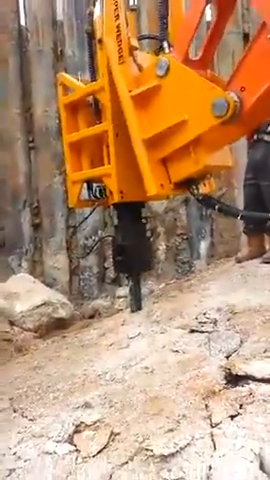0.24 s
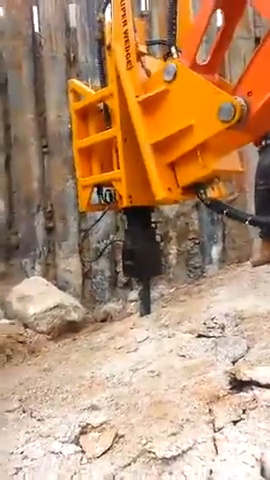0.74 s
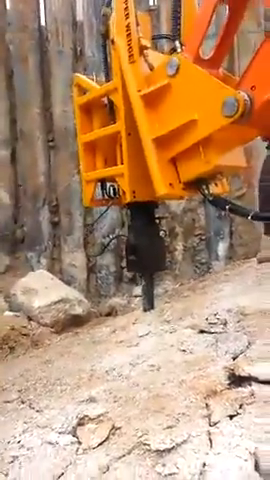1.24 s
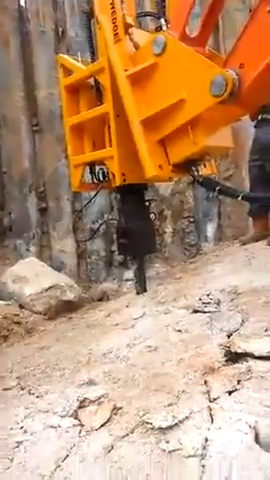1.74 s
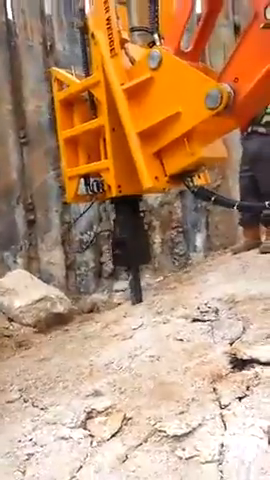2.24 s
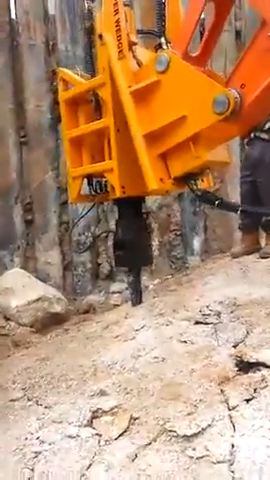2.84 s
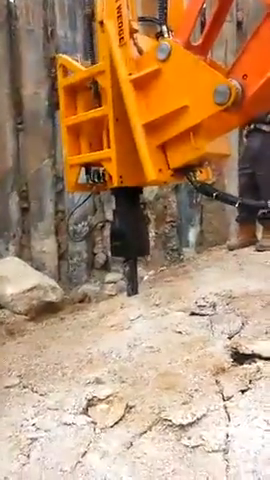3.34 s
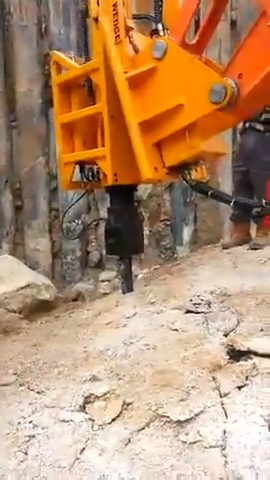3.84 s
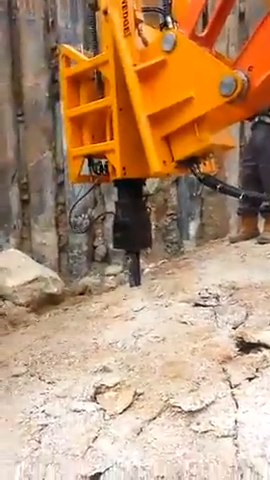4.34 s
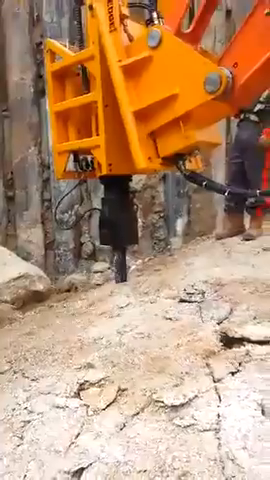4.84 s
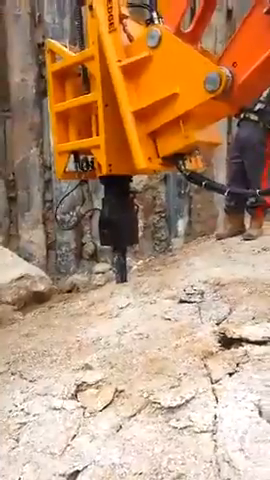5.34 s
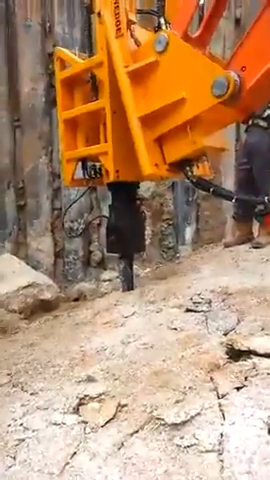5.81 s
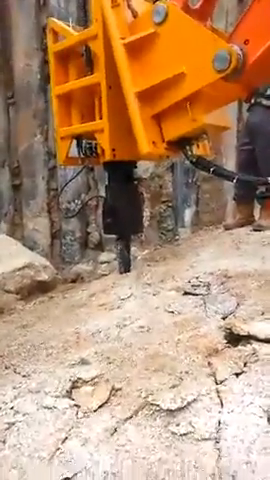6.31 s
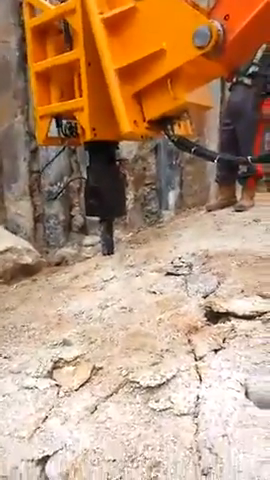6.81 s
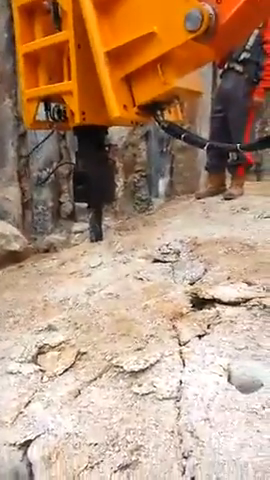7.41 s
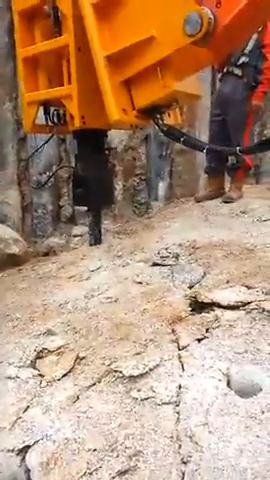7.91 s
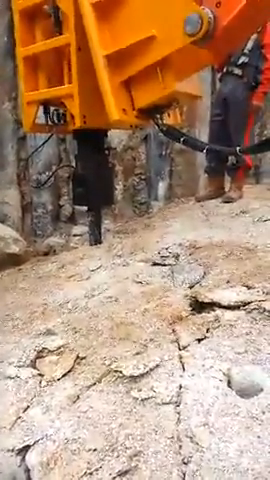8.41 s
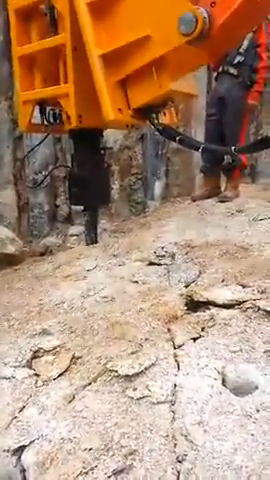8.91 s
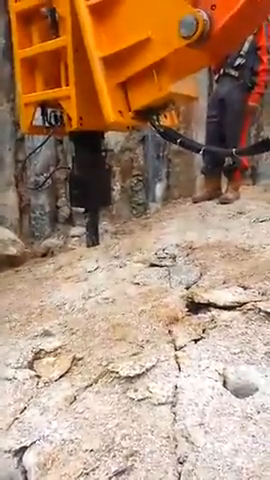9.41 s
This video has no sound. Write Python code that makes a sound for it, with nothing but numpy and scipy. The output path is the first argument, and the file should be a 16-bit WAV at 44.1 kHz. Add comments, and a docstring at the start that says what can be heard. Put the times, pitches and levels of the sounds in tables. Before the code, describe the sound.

At an outdoor work site, a hydraulic wedge is forced into rock over the constant drone and whine of an excavator. Early on the engine strains and a valve squeals in shifting high pitches, then oil surges. After a few small ticks, the rock bursts with one loud crack and a short tearing crunch. A smaller snap follows while the engine noise dips in level and comes back.

```python
"""An excavator's hydraulic wedge splits rock: the stone ticks, then bursts, and the steel rings.
A droning engine turns a whining nine-piston pump, over diesel roar and turbo whistle.
Under load the shaft sags and a relief valve squeals; oil surges as a valve switches.
The camera takes a few soft bumps, and its gain control ducks everything after the burst."""
import sys
import numpy as np
from scipy.fft import rfft, irfft, next_fast_len
from scipy.io import wavfile
from scipy.ndimage import uniform_filter1d, minimum_filter1d, map_coordinates

SR = 44100
rng = np.random.default_rng(int(sys.argv[2]) if len(sys.argv) > 2 else 0)


def generate_wav(sig):
    """Save sig (samples, or channels by samples) to the path in sys.argv[1] as 16-bit PCM at SR."""
    pcm = np.round(np.clip(np.atleast_2d(sig).T, -1, 1) * 32767).astype(np.int16)
    wavfile.write(sys.argv[1], SR, pcm)


N = 426006
T = np.arange(N) / SR
PUSH_S, STALL_S, RELEASE_S, SPLIT_S = 1.02, 1.8, 2.627, 5.77
BUILD_S, DRAIN_S = 0.595, 0.294  # oil pressure rise and fall


def amp(db):
    """Decibels to gain."""
    return 10 ** (np.asarray(db) / 20)


def unit(x):
    """Scale to rms 1."""
    return x / np.sqrt(np.mean(x ** 2) + 1e-20)


def along(points, hz):
    """Interpolate (hz, value) points on a log axis."""
    knots_hz, values = np.transpose(points)
    return np.interp(np.log(hz + 1), np.log(knots_hz + 1), values)


def curve(points):
    """Interpolate (time_s, value) points per sample."""
    return np.interp(T, *np.transpose(points))


def ramp(start_s, length_s):
    """Smooth step, 0 to 1."""
    return np.sin(np.pi / 2 * np.clip((T - start_s) / length_s, 0, 1)) ** 2


def swell(start_s, length_s):
    """Smooth rise and fall."""
    return np.sin(np.pi * np.clip((T - start_s) / length_s, 0, 1)) ** 2


def wobble(rate_hz):
    """Smooth random curve, rms 1."""
    knots = rng.standard_normal(int(N * rate_hz / SR) + 4)
    return unit(map_coordinates(knots, [T * rate_hz]))


def band(centre_hz, width_oct):
    """Bell-shaped response on a log axis."""
    return lambda hz: np.exp(-0.5 * (np.log2((hz + 1) / centre_hz) / width_oct) ** 2)


def resonances(modes):
    """Response of (centre_hz, width_hz, level_db) modes."""
    return lambda hz: np.sqrt(sum(amp(db) ** 2 / (1 + (2 * (hz - centre_hz) / width_hz) ** 2) ** 2
                                  for centre_hz, width_hz, db in modes))


def filtered(x, response):
    """Apply a frequency response."""
    n = x.shape[-1]
    padded = next_fast_len(n + 8192)
    return irfft(rfft(x, padded) * response(np.fft.rfftfreq(padded, 1 / SR)), padded)[..., :n]


def warp(x, speed):
    """Run a stereo sound at a changing speed."""
    return np.array([np.interp(np.cumsum(speed), np.arange(len(channel)), channel) for channel in x])


def rush(colour, envelope=np.ones(N)):
    """Stereo noise, rms 1, enveloped then coloured; coherent bass, diffuse treble."""
    # left-right likeness: freq_hz, coherence
    likeness = [(30, .6), (100, 0.95), (330, 0.97), (600, 0.69), (1200, 0.42), (2500, 0.36), (5000, 0.11),
                (8000, 0.22)]

    def mid_side(hz):
        angle = np.arccos(np.clip(along(likeness, hz), -1, 1)) / 2
        return colour(hz) * np.array([np.cos(angle), np.sin(angle)])

    mid, side = filtered(envelope * rng.standard_normal((2, len(envelope))), mid_side)
    return unit(np.array([mid + side, mid - side]))


def tone(phase, flutter, rate_hz):
    """Sine, rms 1, whose level and phase flutter in moving air."""
    in_phase = (1 + flutter * wobble(rate_hz)) * np.sin(phase)
    return unit(in_phase + flutter * wobble(rate_hz) * np.cos(phase))


def pressure():
    """Oil pressure on the wedge, 0-1: builds, holds, drains."""
    return ramp(PUSH_S, BUILD_S) * (1 - ramp(RELEASE_S, DRAIN_S))


def idle():
    """1 until the pump engages at the push, then 0."""
    return 1 - ramp(PUSH_S, 0.12)


def overtone_shift_db(stalled_db, freed_db):
    """Level change while the wedge is stalled and after the rock splits."""
    stalled = ramp(STALL_S, 0.15) * (1 - ramp(RELEASE_S, DRAIN_S))
    return stalled_db * stalled + freed_db * ramp(SPLIT_S, 0.3)


def bumps(length_s=0.08):
    """Dull knocks on the camera body, different at each microphone."""
    # knocks: centre_s, level_db
    knocks = [(2.41, -47), (8.27, -43), (8.6, -46), (8.915, -43)]
    envelope = sum(amp(db) * swell(centre_s - length_s / 2, length_s) for centre_s, db in knocks)
    return envelope * unit(filtered(rng.standard_normal((2, N)), band(centre_hz=32, width_oct=0.7)))


def turbo():
    """Turbocharger whistle, wandering slightly in pitch."""
    # whistle: time_s, level_db
    levels = [(0, -38.5), (1.1, -46), (3, -44), (4.2, -40.5), (5.7, -42), (7.4, -38), (8.4, -36.5),
              (9.66, -35.5)]
    level_db = curve(levels) + 0.86 * wobble(3.6)
    pitch_hz = 2720 + 5 * wobble(3)
    return amp(level_db) * tone(2 * np.pi * np.cumsum(pitch_hz) / SR, flutter=0.24, rate_hz=25)


def oil_hiss():
    """Flowing oil, louder under pressure."""
    # hiss spectrum: freq_hz, density_db
    spectrum = [(1500, -25), (3000, -1), (3800, -1.5), (4800, 1.5), (5600, 0.9), (6400, -0.2), (7200, -4),
                (8000, -13)]
    level_db = -29 + 2.5 * pressure() + 0.68 * wobble(19)
    return amp(level_db) * rush(lambda hz: amp(along(spectrum, hz)))


def engine_block(shaft_phase):
    """The engine hums at multiples of the shaft speed."""
    # engine orders: multiple, level_db
    orders = [(3, -56), (7, -38.5), (10, -41.5), (11, -40.5), (14, -39), (24, -46), (30, -54.5)]
    return sum(amp(db) * tone(k * shaft_phase, flutter=0.56, rate_hz=12) for k, db in orders)


def diesel_roar():
    """Broad engine noise, slightly softer under load."""
    # roar spectrum: freq_hz, density_db
    spectrum = [(25, -38.5), (55, -24.5), (90, -10.5), (160, -2), (200, -3), (330, 2), (480, 0.5),
                (740, -1.5), (1020, 0.5), (1130, -1.5), (1320, 1.5), (1480, -1.5), (1980, -2), (2820, -7),
                (3020, -9.5), (3500, -12.5), (8000, -39.5)]
    level_db = -20 - pressure() + 0.47 * wobble(25)
    return amp(level_db) * rush(lambda hz: amp(along(spectrum, hz)))


def engine_drone(drone_phase, sag_hz):
    """Engine drone that swells as the shaft sags through one speed."""
    # drone partials: drone_multiple, level_db, swell_share, stalled_db, freed_db
    partials = [(2 / 3, -48, 0, 0, 0), (1, -35, 0, -3.5, 0.5), (2, -32, 0.87, 0.5, -2),
                (8 / 3, -39, 0.5, -4.5, -3.5), (4, -39, 0.4, 5, 2), (6, -42, 1.06, -1, -1),
                (8, -42.5, 0, -1, 7)]
    peak_sag_hz, width_hz = 4.1, 1.9
    nearness = np.exp(-0.5 * ((sag_hz - peak_sag_hz) / width_hz) ** 2)
    swell_db = 7.5 * nearness - 5.5 * idle() + wobble(7.8)
    return sum(amp(db + share * swell_db + overtone_shift_db(stalled_db, freed_db))
               * tone(k * drone_phase, flutter=0.18, rate_hz=13)
               for k, db, share, stalled_db, freed_db in partials)


def pump(piston_phase, unload_s=0.11):
    """Piston harmonics blend hum and whine; the hum dips whenever the pump eases off."""
    # piston harmonics: multiple, level_db, whine_share (the rest is hum), stalled_db, freed_db
    harmonics = [(1, 1.1, 0.08, -1, 0.5), (2, -10, 0.22, -5.5, 3), (3, -2, 0.99, -3, 0.5),
                 (4, -7.5, 0.8, 3, 0.5)]
    # pump easing off: start_s, drop_db, recovery_s
    unloads = [(0.64, 7.5, 0.12), (0.9, 8, 0.06), (2.77, 14.0, 0.22), (5.77, 4.5, 0.55), (8.05, 2.5, 3.6)]
    dip_db = sum(db * ramp(start_s, unload_s) * np.exp(-np.maximum(T - start_s - unload_s, 0) / recovery_s)
                 for start_s, db, recovery_s in unloads)
    hum_db = -20.5 - 4.5 * idle() - 0.5 * pressure() - dip_db + 0.48 * wobble(4)
    whine_db = -33.5 + 2 * idle() + pressure() + 1.2 * wobble(7)
    return sum(amp(db + share * whine_db + (1 - share) * hum_db + overtone_shift_db(stalled_db, freed_db))
               * tone(k * piston_phase, flutter=0.05 * k ** 2, rate_hz=26)
               for k, db, share, stalled_db, freed_db in harmonics)


def pump_rings(piston_phase):
    """The idling pump's third harmonic flares into short metallic rings."""
    # flares: start_s, length_s, level_db
    flares = [(.18, 0.083, -32), (0.276, .08, -30.5), (0.492, .04, -27.5), (0.547, 0.037, -21),
              (0.601, .08, -28)]
    envelope = sum(amp(db) * swell(start_s, length_s) for start_s, length_s, db in flares)
    return envelope * np.sqrt(2) * np.sin(3 * piston_phase)


def machine(free_piston_hz=321.25):
    """The shared shaft stumbles at the push, is caught by the governor and runs free after the split."""
    # drop in piston rate: time_s, sag_hz
    sag = [(0, 0.095), (1.03, 0.3), (1.29, 4.95), (1.67, 7), (1.96, 3.103), (2.75, 3.15), (3.0, 0.1),
           (3.33, 1.395), (5.8, 1.39), (5.95, 0.4), (9.66, 0.4)]
    sag_hz = curve(sag)
    piston_hz = free_piston_hz - sag_hz + 0.25 * wobble(4)
    piston_phase = 2 * np.pi * np.cumsum(piston_hz) / SR
    shaft_phase, drone_phase = piston_phase / 9, piston_phase * 0.434
    pumping = pump(piston_phase) + pump_rings(piston_phase)
    engine = engine_block(shaft_phase) + engine_drone(drone_phase, sag_hz) + turbo()
    drone_throb = 1 + 0.028 * np.cos(drone_phase) + 0.022 * np.cos(2 * drone_phase)
    return pumping + engine + drone_throb * (diesel_roar() + oil_hiss())


def valve_rush(open_db=-27.5, seep_db=-34):
    """Oil seeps past the relief valve's seat, then rushes through as it lifts."""
    # valve resonances: centre_hz, width_hz, level_db
    modes = [(2270, 30, 0), (2320, 30, 1), (2210, 520, -6), (2470, 40, -1.5), (4900, 460, -11),
             (5730, 400, -19), (6400, 300, -14), (7180, 280, -12.5), (7730, 280, -16.5)]
    opening = ramp(start_s=1.37, length_s=0.13) * (1 - ramp(RELEASE_S, 0.21))
    flow = amp(open_db) * opening + amp(seep_db) * pressure()
    return flow * amp(1.2 * wobble(22)) * warp(rush(resonances(modes)), speed=1 + 0.008 * wobble(14))


def valve_squeal(flutter=0.25, rate_hz=70):
    """The trembling valve seat squeals, hopping between pitches."""
    # squeals: start_s, length_s, pitch_hz, level_db
    squeals = [(1.505, .115, 2468, -26), (1.6, .11, 2272, -30), (1.66, .28, 2466, -28.3),
               (1.72, .13, 2330, -32.5), (1.92, .08, 2275, -31.5), (1.985, 0.065, 2272, -26),
               (2.106, 0.064, 2465, -29.5), (2.203, .075, 2330, -24.5), (2.28, .11, 2335, -32),
               (2.29, .19, 2273, -32.5), (2.438, .15, 2330, -31), (2.49, .15, 2487, -30)]
    tremble = 1 + flutter * (wobble(rate_hz) + 1j * wobble(rate_hz))
    notes = sum(amp(db) * swell(start_s, length_s) ** 0.35 * np.exp(2j * np.pi * hz * T)
                for start_s, length_s, hz, db in squeals)
    return np.sqrt(2) * np.real(notes * unit(np.abs(tremble)) * np.exp(1j * np.angle(tremble)))


def oil_surges():
    """A valve switches and the oil gulps: mono turbulence falling in pitch as it slows."""
    # gulps: start_s, length_s, start_hz, end_hz, width_oct, level_db
    gulps = [(1.017, .11, 900, 380, .8, -21.5), (2.655, .085, 850, 550, .6, -19),
             (2.69, .085, 500, 380, .3, -14), (2.72, .075, 310, 250, .35, -17),
             (2.69, .165, 170, 145, .28, -22.5)]
    out = np.zeros(N)
    for start_s, length_s, start_hz, end_hz, width_oct, db in gulps:
        eddies = rush(band(start_hz, width_oct), np.ones(SR // 2))
        progress = np.clip((T - start_s) / length_s, 0, 1)
        speed = (end_hz / start_hz) ** progress * (T > start_s)
        out += amp(db) * swell(start_s, length_s) ** 0.55 * warp(eddies, speed)[0]
    return out


def rock_ticks():
    """Small fractures around the wedge, each a short dying crackle."""
    # fractures: start_s, level_db, centre_hz, width_oct, t60_s
    fractures = [(1.026, -18, 4650, 0.14, 0.085), (1.023, -20, 3000, .55, .14),
                  (2.413, -19.5, 5040, 0.37, 0.091), (2.848, -19.5, 6030, 0.3, .05),
                 (2.88, -15.5, 4480, 0.49, 0.1), (4.13, -13, 1405, 0.99, .015),
                 (4.15, -21, 2880, 0.18, 0.055), (4.499, -17, 4820, 0.51, 0.017),
                 (5.694, -3.5, 1045, 1.3, 0.014), (5.7515, -10, 4030, .9, .04), (5.7546, 6, 650, 0.7, .02),
                 (6.258, 6, 640, 0.68, 0.013), (6.2578, -5, 1895, 0.9, 0.013),
                 (6.2604, -4.5, 1694, 0.9, .014), (6.266, -5, 620, .7, 0.025),
                 (8.074, -23, 5440, 0.37, 0.14), (8.593, -22.5, 3040, 0.5, 0.1),
                 (8.925, -25.5, 4290, .6, .06), (9.4172, -16, 6750, 0.15, .017),
                 (9.4878, -16.5, 6600, 0.17, 0.012), (9.5597, -15, 6300, .14, 0.02)]
    lead = SR // 200  # room for the filter's pre-ring
    out, t = np.zeros((2, N + SR)), T[:SR // 4]
    for start_s, db, centre_hz, width_oct, t60_s in fractures:
        fade = np.pad(amp(-60 * t / t60_s), (lead, 0))
        crackle = rush(band(centre_hz, width_oct), fade) * np.sqrt(np.mean(fade ** 2))
        first = round(start_s * SR) - lead
        out[:, first:first + len(fade)] += amp(db) * crackle
    return out[:, :N]


def wedge_slips():
    """The wedge jerks forward with thuds and groans."""
    # slips: start_s, length_s, pitch_hz, level_db
    slips = [(5.751, 0.013, 245, 3), (5.754, 0.012, 852, 3.5), (5.784, 0.048, 407.5, 3),
             (5.816, 0.015, 407.5, 0), (5.838, 0.035, 280, -8)]
    return sum(amp(db) * swell(start_s, length_s) * np.sqrt(2) * np.sin(2 * np.pi * hz * T)
               for start_s, length_s, hz, db in slips)


def rock_split():
    """The rock bursts, then tears, in gritty fractures that ring the steel wedge."""
    # burst and tear: start_s, rise_s, hold_s, level_db, t60_s, grit_db, ring_db
    bursts = [(5.758, 0.001, 0.0076, 11, 0.035, 3, 0), (5.763, 0.032, 0.012, 1.8, 0.27, 3.3, -10)]
    # fracture spectrum: freq_hz, density_db
    stone = [(60, -24), (170, -6), (400, 4.5), (650, 0.5), (850, 1.5), (980, -5), (1300, -3.5), (2000, -2),
             (3500, -7), (5200, -6), (6800, -9), (8000, -19.5)]
    # wedge and rock resonances: centre_hz, width_hz, level_db
    modes = [(404, 100, 0.5), (820, 150, -1), (2920, 400, -5.5), (4770, 170, -0.5), (5170, 160, -3),
             (6600, 260, -5.5)]
    out = np.zeros((2, N))
    for start_s, rise_s, hold_s, db, t60_s, grit_db, ring_db in bursts:
        grains = amp(grit_db * wobble(1200))
        fractures = rush(lambda hz: amp(along(stone, hz)), grains)
        ringing = amp(ring_db) * rush(resonances(modes), grains)
        decay_db = 60 * np.maximum(T - start_s - rise_s - hold_s, 0) / t60_s
        out += ramp(start_s, rise_s) * amp(db - decay_db) * (fractures + ringing)
    return out


def off_axis(x):
    """Sound from the side reaches the left microphone slightly later, with more midrange."""
    # left minus right: freq_hz, level_db
    lean = [(100, 0), (330, -0.6), (900, 2.5), (1500, 3.5), (2500, 5.5), (4400, -0.5), (7500, 3)]
    # left behind right: freq_hz, lag_rad
    lag = [(100, 0), (330, -0.15), (1100, 0), (2760, 1.3), (4000, 5.8), (5500, 7), (7700, 10.5)]
    side = np.array([[0.5], [-0.5]])
    return filtered(x, lambda hz: amp(side * along(lean, hz)) * np.exp(-1j * side * along(lag, hz)))


def scene():
    """Machine to one side, rock straight ahead."""
    excavator = off_axis(machine() + valve_rush() + valve_squeal())
    return excavator + oil_surges() + rock_ticks() + rock_split() + wedge_slips() + bumps()


def gain_control(x, limit_db, hold_s, recovery_db_per_s):
    """Looks ahead, ducks at a loud sound, holds, then recovers."""
    power = np.abs(uniform_filter1d(np.mean(x ** 2, axis=0), SR // 80))
    needed_db = np.minimum(0, limit_db - 10 * np.log10(power + 1e-12))
    window, ahead = int(hold_s * SR) // 2 * 2 + 1, SR // 50
    held_db = minimum_filter1d(needed_db, window, origin=window // 2, mode="nearest")
    climb_db = recovery_db_per_s * T
    gain_db = np.minimum.accumulate(held_db - climb_db) + climb_db
    return x * amp(uniform_filter1d(gain_db, ahead, origin=-ahead // 2 + 1))


def record(dry):
    """The camera's gain control, soft ceiling and band limit."""
    ceiling, top_hz = 0.95, 8064
    ducked = gain_control(dry, limit_db=-4.0, hold_s=0.85, recovery_db_per_s=21.5)
    limited = ducked / (1 + np.abs(ducked / ceiling) ** 6) ** (1 / 6)
    return filtered(limited, lambda hz: hz < top_hz)


dry = scene()
out = record(dry)
generate_wav(out)
```